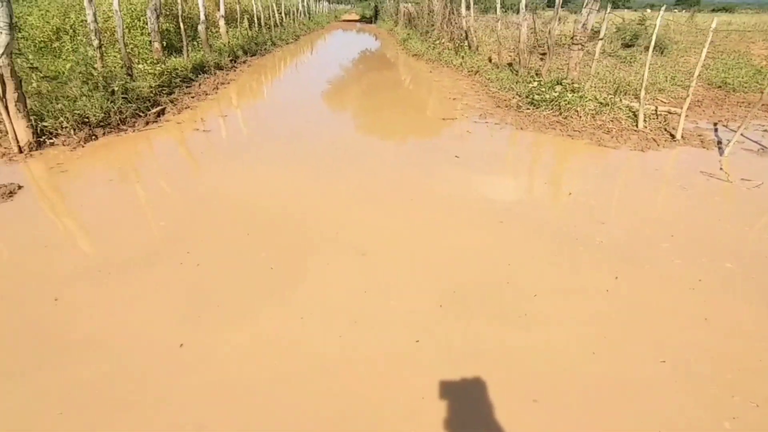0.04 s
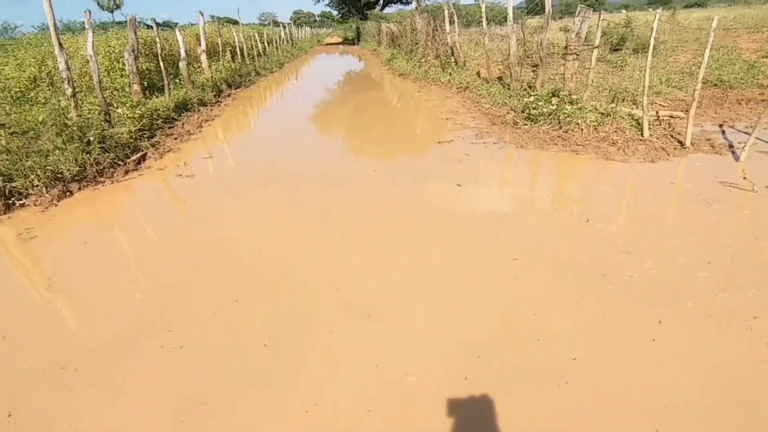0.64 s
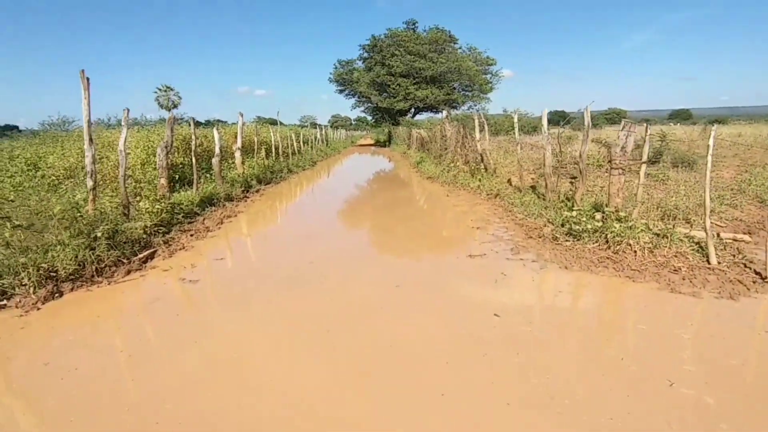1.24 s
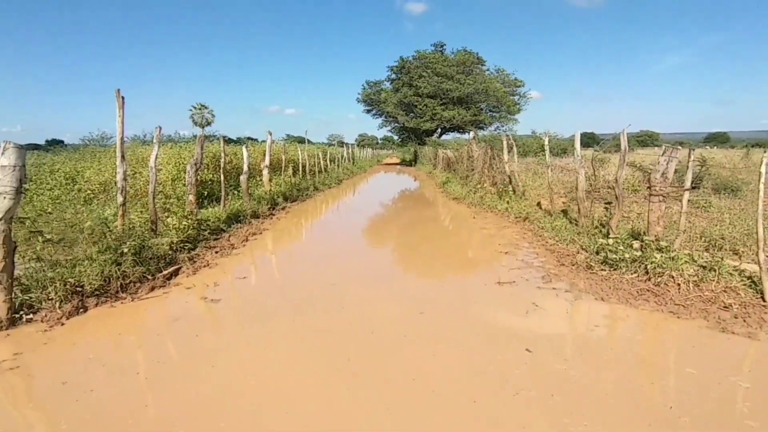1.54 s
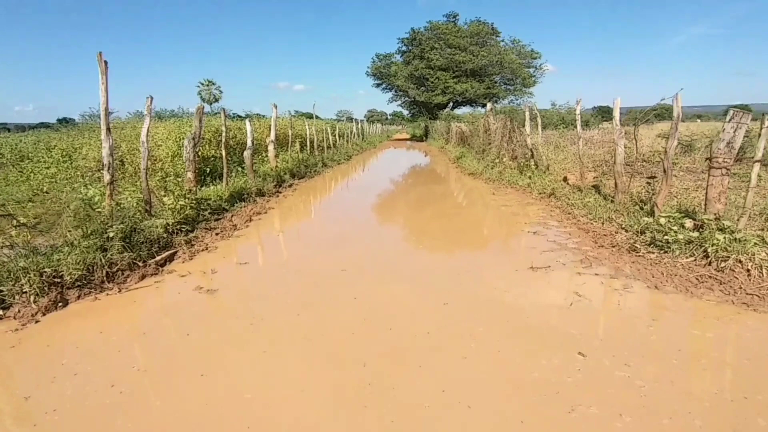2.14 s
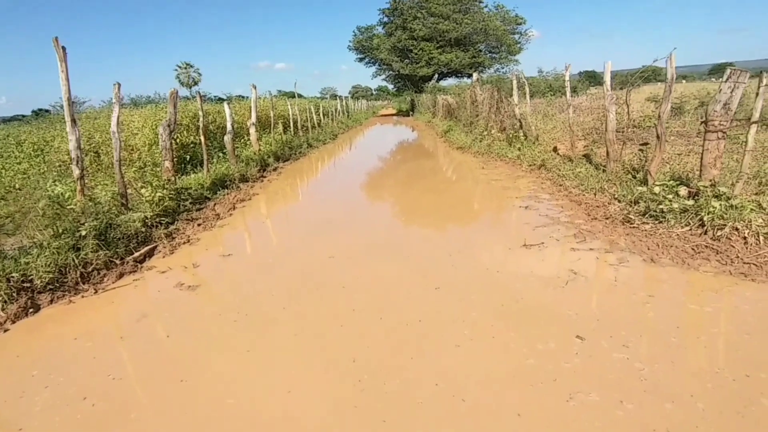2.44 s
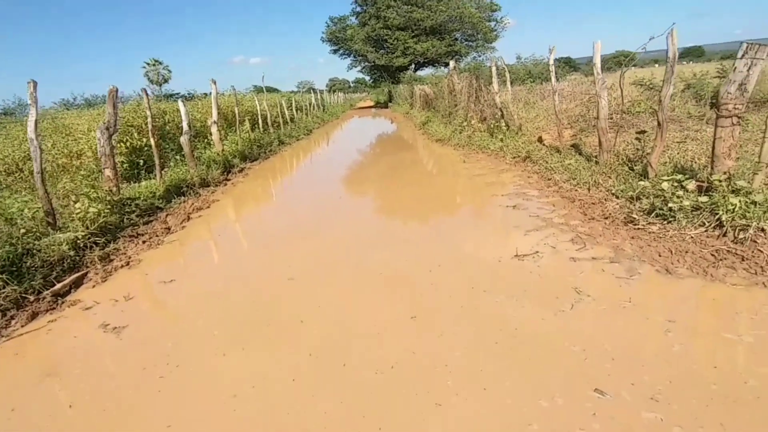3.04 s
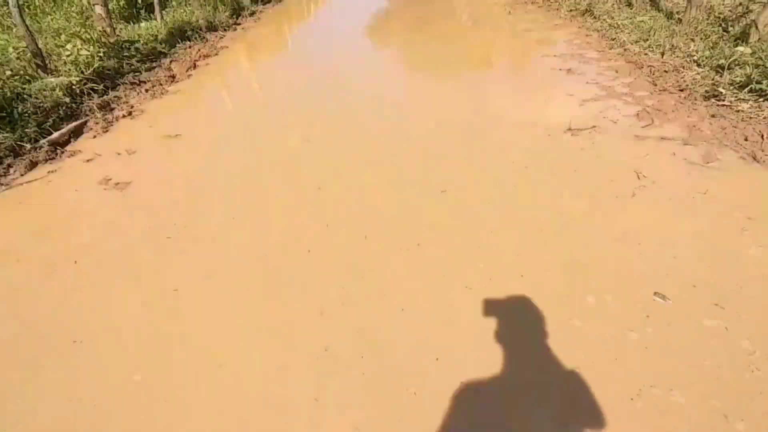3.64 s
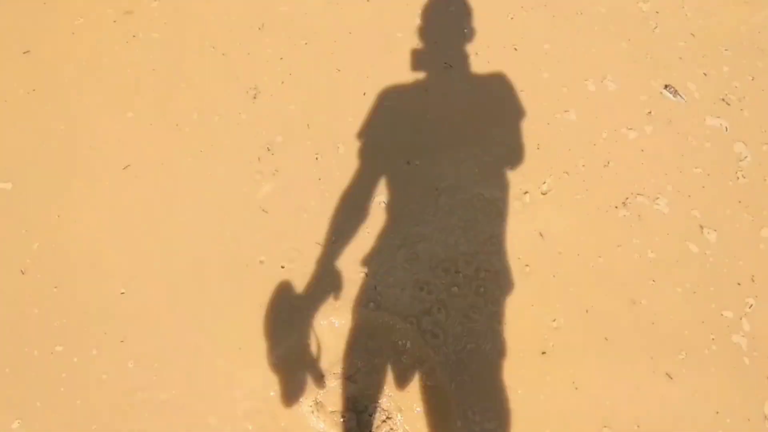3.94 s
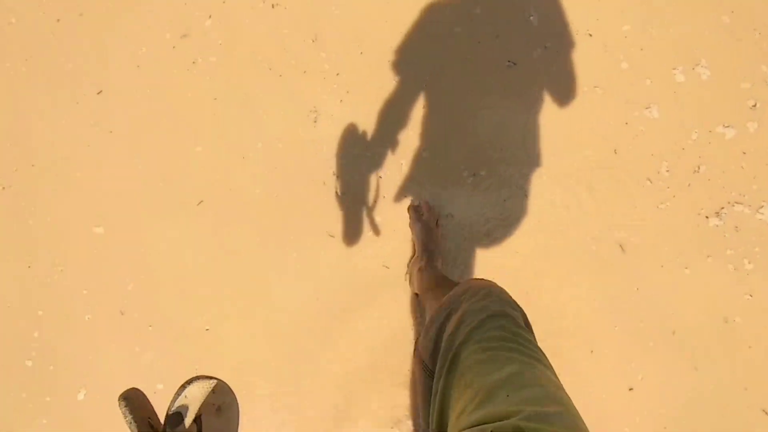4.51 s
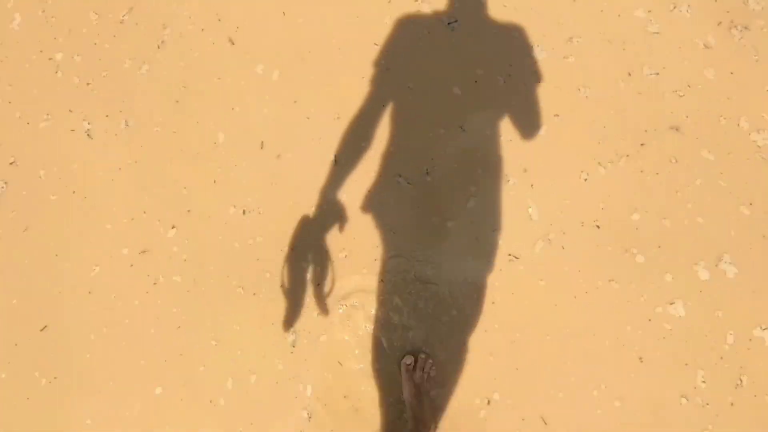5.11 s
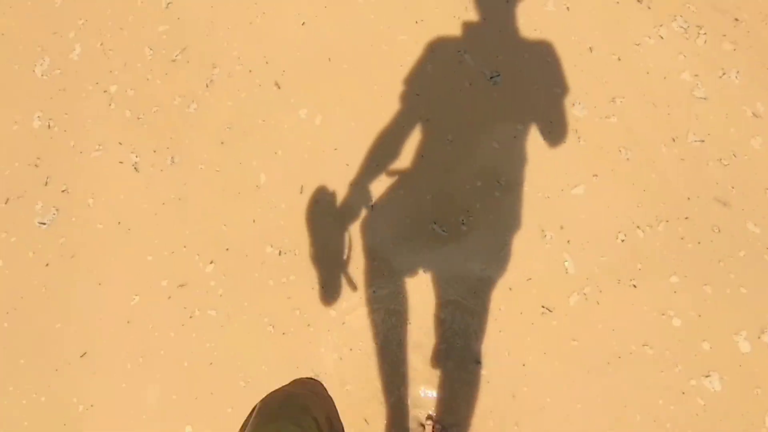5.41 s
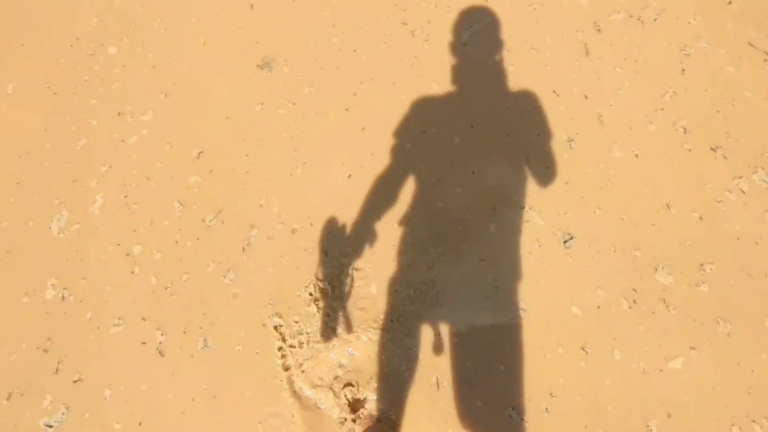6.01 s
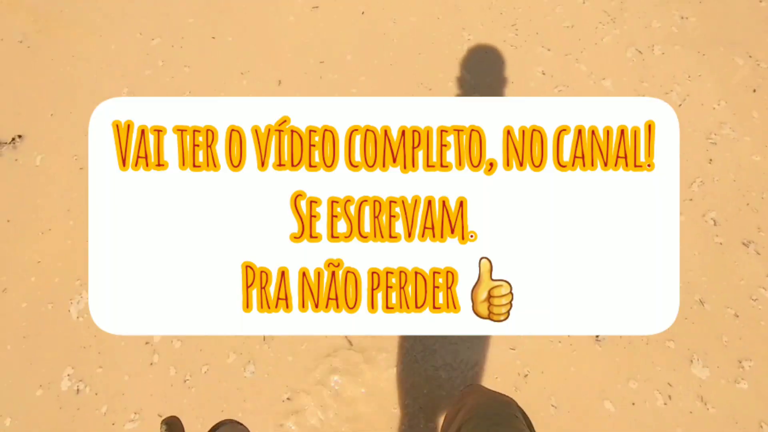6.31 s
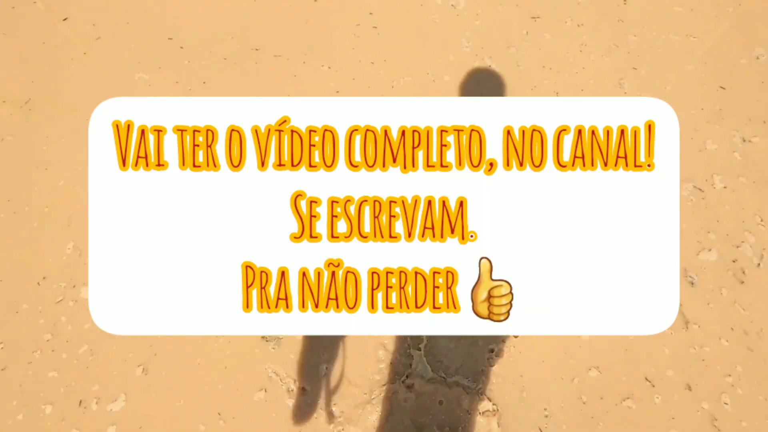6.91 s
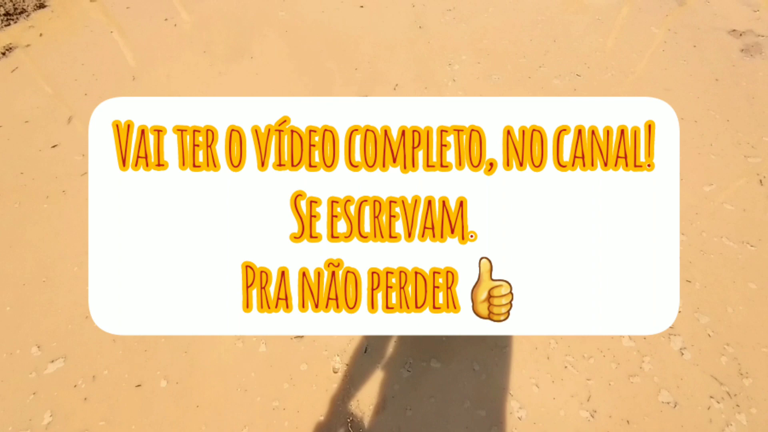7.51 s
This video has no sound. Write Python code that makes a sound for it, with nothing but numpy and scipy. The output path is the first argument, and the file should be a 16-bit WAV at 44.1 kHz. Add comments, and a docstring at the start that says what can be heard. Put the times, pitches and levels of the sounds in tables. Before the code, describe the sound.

Bare feet wade through shallow muddy water on a flooded dirt road, heard close from a hand-held microphone. Each stride brings bubbly plops and a gurgling slosh, with light spray pattering back and a few small drips. Gusts of wind rumble on the microphone, mostly on the right, growing stronger from about three seconds in and adding low thumps. Faint open air lies behind.

```python
"""A flooded dirt road, where bare feet wade through shallow muddy water, heard from a hand-held recorder.
Each stride drags air under: large bubbles plop with rising pitch and a cloud of small ones gurgles.
Thrown spray patters back, wavelets slap the shins and the legs drip. Gusts rumble on the microphone
ports, mostly the right one. Behind it all are faint open air and an insect ringing from the verge."""
import sys
import numpy as np
from scipy import signal
from scipy.fft import rfft, irfft
from scipy.io import wavfile
from scipy.ndimage import uniform_filter1d

SR = 44100
rng = np.random.default_rng(int(sys.argv[2]) if len(sys.argv) > 2 else 0)


def store_wav(level_fs):
    """Save 16-bit WAV to argv[1]."""
    pcm = np.round(np.clip(np.atleast_2d(level_fs), -1, 1) * 32767)
    wavfile.write(sys.argv[1], SR, pcm.T.astype(np.int16))


N = 341775
TIME = np.arange(N) / SR


def from_db(db):
    """Decibels to gain."""
    return 10 ** (np.asarray(db) / 20)


def rms_one(x):
    """Scale to rms 1."""
    return x / np.sqrt(np.mean(x ** 2) + 1e-20)


def at_hz(spectrum, hz):
    """Read an EQ curve in dB on a log-frequency axis."""
    freq_hz, level_db = np.transpose(spectrum)
    return np.interp(np.log(np.maximum(hz, 1)), np.log(freq_hz), level_db)


def colour(x, spectrum, size=1024):
    """Minimum-phase EQ with the given curve."""
    curve_db = at_hz(spectrum, np.fft.rfftfreq(size, 1 / SR))
    cepstrum = irfft(np.log(from_db(curve_db)))
    cepstrum[1:size // 2] *= 2
    cepstrum[size // 2 + 1:] = 0
    response = irfft(np.exp(rfft(cepstrum)))
    return signal.oaconvolve(np.atleast_2d(x), response[None], axes=1)[:, :N]


def lowpass(x, order, hz):
    """Butterworth high cut."""
    return signal.sosfilt(signal.butter(order, hz, fs=SR, output="sos"), x)


def bandpass(x, low_hz, high_hz):
    """Gentle band filter."""
    return signal.sosfilt(signal.butter(2, [low_hz, high_hz], "band", fs=SR, output="sos"), x)


def level_out(x, window_s, floor):
    """Ride the gain to hold the running rms near 1."""
    size = int(window_s * SR)
    power = uniform_filter1d(uniform_filter1d(x ** 2, size), size)
    return x / np.sqrt(np.abs(power) + floor)


def drift(per_s):
    """Smooth random modulation of rms 1."""
    return rms_one(np.interp(TIME * per_s, np.arange(4096), rng.standard_normal(4096)))


def swell(start_s, hold_s, rise_s, fall_s):
    """Attack, hold and release envelope, at most 1."""
    age = np.maximum(TIME - start_s, 0)
    return (1 - np.exp(-age / rise_s)) * np.exp(-np.clip((age - hold_s) / fall_s, 0, 20))


def add(track, start_s, sound):
    """Mix a sound into a track."""
    start = int(np.clip(start_s * SR, 0, N - 1))
    track[start:start + len(sound)] += sound[:N - start]


def scatter(x, t60_s, taps=5000):
    """Dense short reflections from legs, body and rippled water, different at each port."""
    t = np.arange(taps) / SR
    response = rng.standard_normal((2, taps)) * np.exp(-np.log(1000) * t / t60_s) * (t > .001)
    response /= np.sqrt(np.sum(response ** 2, axis=1, keepdims=True))
    return signal.oaconvolve(np.atleast_2d(x), response, axes=1)[:, :N]


def at_ports(x, scatter_db, t60_s, left_db, left_lag_s=0.00011):
    """Place water in stereo, with reflections: it reaches the left port slightly later and weaker."""
    direct = np.array([np.interp(TIME - left_lag_s, TIME, x), x])
    return (direct + from_db(scatter_db) * scatter(x, t60_s)) * from_db([[left_db], [0]])


def bubble(hz, t60_s, climb_per_s, onset=0.02):
    """A bubble pinches off and rings; its pitch climbs as it nears the surface."""
    t = np.arange(int(t60_s * SR) + 2) / SR
    envelope = (1 - np.exp(-t / (onset * t60_s))) * np.exp(-np.log(1000) * t / t60_s)
    return envelope / envelope.max() * np.sin(2 * np.pi * hz * t * (1 + climb_per_s * t / 2))


def bubble_cloud(spectrum, per_s, cycles, glide, spread_db, even_s):
    """Small bubbles of random pitch, strength and life, at a level held near 1."""
    out = np.zeros(N)
    low_hz, high_hz = spectrum[0][0], spectrum[-1][0]
    for when, pitch, strength, life in rng.random((12000, 4))[:int(per_s * N / SR)]:
        hz = low_hz + (high_hz - low_hz) * pitch
        t60_s = cycles * 2 ** (2 * life - 1) / hz
        level_db = at_hz(spectrum, hz) - spread_db * np.log(1 - .98 * strength)  # few are strong
        add(out, when * N / SR, from_db(level_db) * bubble(hz, t60_s, glide * life / t60_s))
    return level_out(out, even_s, floor=1e-9)


def insect(pitch_hz=10100, width_hz=500, level_db=-101, nearest_s=1.5, pass_s=1.1):
    """A thin insect ring from the verge swells and fades as the walker passes."""
    ring = bandpass(rng.standard_normal((2, N)), pitch_hz - width_hz / 2, pitch_hz + width_hz / 2)
    distance = np.hypot(1, (TIME - nearest_s) / pass_s)
    return from_db(level_db) / distance * rms_one(ring)


# Tone of the outdoor bed: freq_hz, gain_db
AIR_EQ = [(30, 6), (120, -2), (180, 7.5), (280, 6.5), (450, -4), (1000, -6.5), (2500, -10.5), (3400, -33),
          (8500, -38.5), (9700, -36.5), (11000, -39.5), (15000, -39)]

def open_air(level_db=-61.5):
    """A soft, wide bed of dark noise, leaning right."""
    bed = rms_one(colour(rng.standard_normal((2, N)), AIR_EQ))
    return from_db(level_db) * bed * from_db([[-3], [0]])


# Gust cues: start_s, hold_s, left_db, right_db
GUSTS = [(-.02, 0.081, -73, -45), (0.134, 0.09, -61, -38.5), (0.464, 0.044, -56, -35),
         (1.025, .38, -62, -41.5), (1.503, 0.24, -62, -40.5), (1.755, 0.16, -56, -33.5),
         (2.545, 0.067, -50, -48), (2.901, 0.46, -62, -30), (3.338, 0.17, -38, -32.5),
         (4.076, 0.035, -39, -36.5), (4.138, 0.076, -57, -29.5), (4.349, 0.23, -63, -26.5),
         (4.705, 0.083, -64, -28), (4.835, 0.21, -60.5, -41.5), (5.051, 0.58, -61, -29),
         (5.29, 0.2, -49, -25), (5.899, 0.11, -43, -34), (6.036, 0.12, -42, -36), (6.218, 0.55, -53, -30.5),
         (6.498, 0.088, -59, -23.5), (6.918, 0.25, -51.5, -45), (7.157, 0.17, -55, -28),
         (7.346, 0.18, -63, -33)]

def gust_levels(breeze_db=(-56.5, -50.5), flutter_db=0.57, flutters_per_s=16):
    """Wind strength in dB, left and right: fluttering gusts on top of a light breeze."""
    power = from_db(breeze_db)[:, None] ** 2
    for start_s, hold_s, left_db, right_db in GUSTS:
        gust = swell(start_s, hold_s, rise_s=0.02, fall_s=0.049)
        power = power + (from_db([[left_db], [right_db]]) * gust) ** 2
    flutter = np.tanh([drift(flutters_per_s), drift(flutters_per_s)])
    return 10 * np.log10(power) + flutter_db * flutter


# Tone of the wind rumble: freq_hz, gain_db
RUMBLE_EQ = [(12, 11), (24, 2.5), (45, 1), (90, -4), (130, -14.5), (180, -24), (250, -50), (350, -57.5),
             (600, -63), (1200, -65)]

def rumble(gust_db, gain_db, lumpy_db, brighten=0.67, usual_db=-35):
    """Turbulence at one port: stronger gusts shed smaller eddies, so the rumble reaches higher."""
    edges_hz = 14 * 2 ** np.arange(0, 6.5, .5)
    white = rng.standard_normal((2, N))
    eddies = np.tanh(drift(70))
    tilt_db_per_octave = brighten * (gust_db - usual_db) + lumpy_db * eddies
    out = 0
    for k, (low_hz, high_hz) in enumerate(zip(edges_hz, edges_hz[1:])):
        hz = np.sqrt(low_hz * high_hz)
        octaves = np.clip(np.log2(hz / 60), 0, 2)
        gain = from_db(at_hz(RUMBLE_EQ, hz) + octaves * tilt_db_per_octave)
        out = out + gain * bandpass(white[k % 2], low_hz, high_hz)
    return from_db(gust_db + gain_db) * level_out(out, 0.05, floor=1e-12)


# Wind thumps on the right port: start_s, level_db, pitch_hz
BUFFETS = [(3.052, -31.5, 214), (3.258, -19.5, 184), (4.43, -22.5, 196), (4.511, -19, 169),
           (4.554, -14.5, 129), (5.347, -11, 79), (5.359, -15, 186), (5.365, -22.5, 424),
           (5.389, -22.5, 255), (6.315, -31.5, 248), (6.542, -16.5, 117), (6.717, -13, 107),
           (7.274, -22, 169)]

def buffets(rise_cycles=0.41, gain_db=2.5):
    """A single hard eddy pushes and pulls the diaphragm for a cycle or two."""
    out, t = np.zeros(N), TIME[:SR // 10]
    for start_s, level_db, hz in BUFFETS:
        age = t * hz / rise_cycles
        thump = age * np.exp(1 - age) * np.sin(2 * np.pi * hz * t)
        add(out, start_s, from_db(level_db + gain_db) * thump)
    return out


def wind():
    """Rumble on both ports and thumps on the right; eddies carry no treble."""
    left_db, right_db = gust_levels()
    left = rumble(left_db, gain_db=5.0, lumpy_db=5.0)
    right = rumble(right_db, gain_db=2.5, lumpy_db=4.5) + buffets()
    return lowpass([left, right], order=4, hz=700)


# Featured drips from the legs: start_s, level_db, pitch_hz
DRIPS = [(.449, -64, 5940), (.765, -62, 4800), (3.599, -55.5, 5000), (3.879, -63, 5960),
         (4.102, -61.5, 6100), (4.261, -62, 3290), (4.314, -40.5, 2300), (4.41, -60, 3500),
         (5.988, -56.5, 5300), (7.096, -61.5, 5550)]

def drips(faint_per_s=2.3, faint_db=-75, faint_hz=(4200, 6300), gain_db=-3.5):
    """Drips plink on the surface, high and short; fainter ones fall at random between the cues."""
    out = np.zeros(N)
    times = np.cumsum(rng.exponential(1, 100)) / faint_per_s
    pitches = rng.uniform(*faint_hz, len(times))
    faint = [(start_s, faint_db, hz) for start_s, hz in zip(times, pitches) if start_s < N / SR]
    for start_s, level_db, hz in DRIPS + faint:
        plink = bubble(hz, t60_s=0.0038, climb_per_s=0, onset=0.14)
        add(out, start_s, from_db(level_db + gain_db) * plink)
    return (out + from_db(-1.5) * scatter(out, t60_s=0.033)) * from_db([[0], [-6]])


# Wavelet hits on the shins: start_s, level_db
SLAPS = [(0.196, -42.5), (0.763, -38.5), (1.87, -46), (4.46, -44), (4.576, -45), (5.285, -47), (5.631, -36),
         (5.769, -39.5), (6.566, -32)]
# Tone of a slap: freq_hz, gain_db
SLAP_EQ = [(250, -7), (700, 9.5), (1300, 12), (2300, -7.5), (2900, -18.5), (3600, -17), (8000, -46)]

def slaps(decay_s=0.0023, gain_db=3.0):
    """A wavelet hits skin: a dull crack of a few milliseconds."""
    out, t = np.zeros(N), TIME[:SR // 30]
    noise = colour(rng.standard_normal(N), SLAP_EQ)[0]
    for start_s, level_db in SLAPS:
        crack = noise[int(start_s * SR):][:len(t)] * np.exp(-t / decay_s)
        add(out, start_s, from_db(level_db + gain_db) * crack / np.abs(crack).max())
    return at_ports(lowpass(out, order=4, hz=3500), scatter_db=-8.0, t60_s=0.12, left_db=-3.5)


# Showers of thrown water falling back: start_s, hold_s, level_db
SHOWERS = [(0.573, 0.0034, -62), (1.449, 0.012, -59.5), (1.6, 0.042, -67), (2.336, .007, -74),
           (2.47, 0.066, -66.5), (2.723, 0.034, -78.5), (3.239, 0.053, -67), (3.357, 0.032, -62.5),
           (3.425, 0.024, -59), (3.475, 0.039, -65.5), (4.643, .022, -65.5), (5.34, 0.036, -73.5),
           (5.466, 0.065, -61), (5.542, 0.11, -64), (5.642, 0.0072, -66), (5.675, 0.046, -72),
           (6.359, 0.069, -63), (6.394, .11, -59), (6.519, 0.028, -55.5), (6.62, 0.032, -66.5),
           (7.215, 0.0075, -53), (7.232, 0.16, -60), (7.367, 0.051, -53.5)]
# Tone of the droplets: freq_hz, gain_db
SPRAY_EQ = [(1500, -7), (2500, 10), (3400, -17), (4300, 2.5), (5500, -12), (6600, -17), (8000, -8),
            (10000, -3.5), (12500, -19), (15500, -30.5)]
# Colour the left port gives the spray: freq_hz, gain_db
LEFT_PORT_EQ = [(1000, 6), (3200, 1), (5200, 13), (7000, 6.5), (9500, -20), (15000, -1)]

def spray(froth_level, fizz_db=-30, rise_s=0.0029, fall_s=0.007, clump_db=1.5, clumps_per_s=82):
    """Droplets land in clumps, starting sharply and thinning out fast; bursting froth fizzes on."""
    level = froth_level * from_db(fizz_db)
    for start_s, hold_s, level_db in SHOWERS:
        t = np.arange(int((hold_s + 8 * fall_s) * SR)) / SR
        envelope = (1 - np.exp(-t / rise_s)) * np.exp(-np.maximum(t - hold_s, 0) / fall_s)
        add(level, start_s, from_db(level_db) * envelope)
    droplets = bubble_cloud(SPRAY_EQ, per_s=1900, cycles=8.2, glide=.05, spread_db=5.0, even_s=0.022)
    mist = 0.36 * rms_one(colour(rng.standard_normal(N), SPRAY_EQ)[0])
    patter = (droplets + mist) * from_db(clump_db * np.tanh(drift(clumps_per_s)))
    left, right = at_ports(level * patter, scatter_db=-3, t60_s=0.023, left_db=-3.0)
    return np.array([colour(left, LEFT_PORT_EQ)[0], right])


# Leg sweeps through the water: start_s, push_s, gurgle_db, froth_db, backwash_delay_s, backwash_db
LEG_SWEEPS = [(-0.02, 0.018, -51.5, -53.5, 0.05, -62.5), (0.722, 0.08, -60, -64, 0.15, -61.5),
              (1.215, 0.057, -58.5, -84, 0.22, -59), (1.579, 0.044, -48, -71, 0.12, -53.5),
              (1.864, 0.11, -56, -58.5, 0.077, -60.5), (2.465, 0.14, -52, -55.5, 0.23, -52),
              (3.227, .1, -56.5, -66, 0.08, -51.5), (3.338, 0.1, -57, -54, 0.25, -50.5),
              (4.658, 0.018, -49, -59, 0.078, -56.5), (5.022, 0.059, -61, -64, 0.22, -69),
              (5.46, .19, -57, -59, 0.23, -51.5), (6.387, 0.23, -51, -61, 0.2, -57),
              (7.225, 0.34, -51, -58, 0.38, -63)]

def stirring(ripple_gurgle_db=-71, ripple_froth_db=-82, backwash_froth_db=-9):
    """Gurgle and froth envelopes: a leg pushes, then water closes behind it, over steady ripples."""
    gurgle_power, froth_power = from_db(ripple_gurgle_db) ** 2, from_db(ripple_froth_db) ** 2
    for start_s, push_s, gurgle_db, froth_db, delay_s, backwash_db in LEG_SWEEPS:
        push = swell(start_s, push_s, rise_s=0.0027, fall_s=0.057)
        backwash = from_db(backwash_db) * swell(start_s + delay_s, 0.14, rise_s=0.017, fall_s=0.19)
        gurgle_power += (from_db(gurgle_db) * push) ** 2 + backwash ** 2
        froth_power += (from_db(froth_db) * push) ** 2 + (from_db(backwash_froth_db) * backwash) ** 2
    return np.sqrt(gurgle_power), np.sqrt(froth_power)


# Tone of the middle-sized bubbles: pitch_hz, gain_db
GURGLE_EQ = [(300, -12), (480, -3.5), (750, -1.5), (1200, -4), (1600, -3), (2200, -3.5)]
# Tone of the tiny bubbles: pitch_hz, gain_db
FROTH_EQ = [(800, 1.5), (1300, 3.5), (1700, -3.5), (2300, 3), (2650, -12.5), (3000, -16.5), (3400, -31.5)]

def slosh(gurgle_level, froth_level, froth_db=-2.5, clump_db=5.0, clumps_per_s=55):
    """Stirred water gurgles and froths, in clumps as wavelets fold over."""
    clumps = from_db(clump_db * np.tanh(drift(clumps_per_s)))
    gurgle = bubble_cloud(GURGLE_EQ, per_s=420, cycles=19.8, glide=.45, spread_db=2.0, even_s=0.024)
    froth = bubble_cloud(FROTH_EQ, per_s=1300, cycles=17.6, glide=0.5, spread_db=8.0, even_s=0.13)
    gurgle = at_ports(gurgle_level * clumps * gurgle, scatter_db=-9.0, t60_s=.12, left_db=-3.0)
    froth = at_ports(froth_level * clumps * froth, scatter_db=3.5, t60_s=0.016, left_db=-6.5)
    return lowpass(gurgle + from_db(froth_db) * froth, order=8, hz=2850)


# Featured large bubbles: start_s, start_pitch_hz, level_db, t60_s
PLOPS = [(0.016, 2340, -43, 0.022), (0.181, 613, -46.5, 0.028), (0.58, 786, -33.5, 0.0075),
         (0.581, 1320, -36.5, .009), (0.586, 1720, -34.5, .007), (0.756, 620, -49, 0.13),
         (0.891, 880, -42.5, 0.014), (0.9, 573, -42, 0.02), (0.937, 490, -39.5, .04),
         (1.013, 1004, -36, 0.013), (1.456, 1200, -31.5, 0.011), (1.599, 586, -30.5, 0.017),
         (1.626, 1320, -38.5, 0.017), (1.634, 804, -33.5, 0.02), (1.663, 460, -32, 0.0066),
         (1.665, 1047, -31.5, 0.033), (1.868, 610, -41.5, 0.023), (1.937, 403, -50.5, 0.16),
         (2.348, 1850, -38, 0.0051), (2.405, 625, -48, 0.084), (2.475, 1290, -37.5, 0.015),
         (2.541, 699, -40.5, 0.057), (2.815, 788, -35.5, 0.033), (2.859, 980, -43, 0.046),
         (3.389, 652, -41, 0.044), (3.429, 460, -26, 0.0054), (3.432, 1340, -30, 0.004),
         (3.481, 1000, -35, 0.015), (3.535, 400, -47, 0.066), (3.668, 945, -31, 0.01),
         (3.682, 730, -31.5, 0.042), (3.74, 579, -40.5, 0.16), (3.773, 524, -40.5, 0.074),
         (3.822, 1090, -37, 0.022), (3.896, 930, -42, 0.022), (4.077, 908, -50, 0.078),
         (4.67, 1410, -39, 0.015), (4.679, 966, -38, 0.014), (4.682, 503, -35, 0.02),
         (5.052, 1700, -44.5, 0.032), (5.285, 640, -46, 0.092), (5.654, 1040, -34, 0.011),
         (5.766, 782, -38.5, 0.044), (6.234, 470, -51.5, 0.15), (6.423, 655, -35, 0.045),
         (6.437, 1200, -30, 0.014), (6.475, 870, -35.5, 0.04), (6.524, 1350, -28.5, .013),
         (6.566, 786, -41.5, 0.059), (7.214, 1410, -33.5, 0.0089), (7.256, 1140, -38, 0.029),
         (7.28, 830, -38.5, .053), (7.314, 623, -39, 0.053), (7.375, 1175, -27.5, 0.0075),
         (7.395, 1300, -34.5, 0.016), (7.412, 860, -31.5, 0.014), (7.465, 2260, -41, 0.021),
         (7.712, 1684, -41.5, 0.025)]

def plops(gain_db=3.5, climb_per_s=22, onset=0.032,
          shed_db=-13.5, shed_within_s=.035, shed_octaves=.6, shed_t60_s=0.012):
    """Large bubbles trapped behind each foot ring; each sheds two smaller, weaker ones just after."""
    out = np.zeros(N)
    for start_s, hz, level_db, t60_s in PLOPS:
        gain = from_db(level_db + gain_db)
        add(out, start_s, gain * bubble(hz, t60_s, climb_per_s, onset))
        for when, pitch in rng.random((2, 2)):
            shed = bubble(hz * 2 ** (shed_octaves * pitch), shed_t60_s, climb_per_s, onset)
            add(out, start_s + shed_within_s * when, gain * from_db(shed_db) * shed)
    return at_ports(out, scatter_db=-4.5, t60_s=0.056, left_db=-4.5)


def scene():
    """The mix: water below, wind on the ports, faint open air all round."""
    gurgle_level, froth_level = stirring()
    water = plops() + slosh(gurgle_level, froth_level) + spray(froth_level) + drips()
    return water + wind() + open_air() + slaps() + insect()


def record(dry):
    """The recorder cuts the top steeply."""
    return signal.sosfilt(signal.cheby2(16, 70, 16300, fs=SR, output="sos"), dry)


dry = scene()
out = record(dry)
store_wav(out)
```